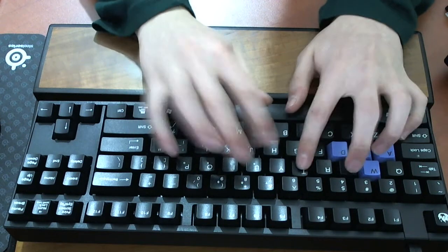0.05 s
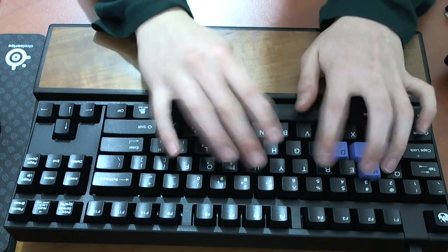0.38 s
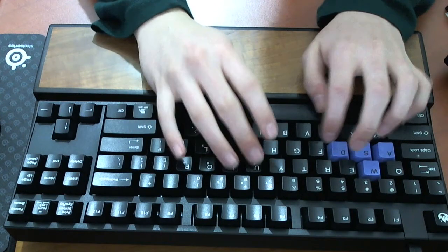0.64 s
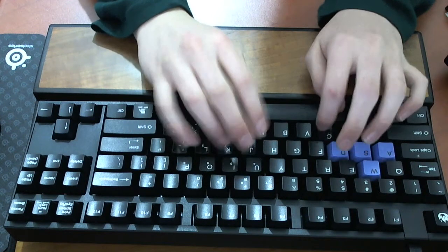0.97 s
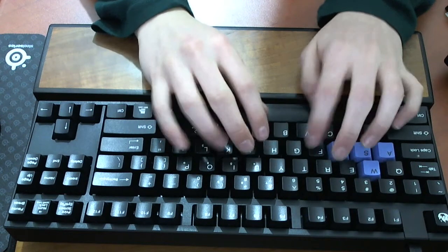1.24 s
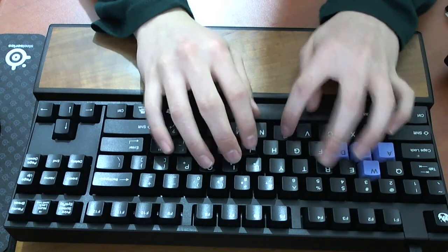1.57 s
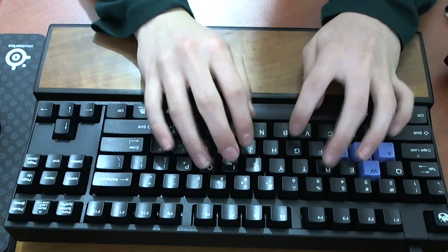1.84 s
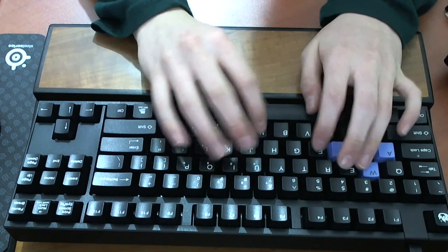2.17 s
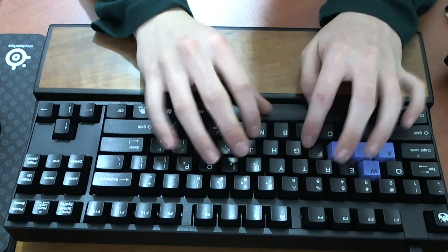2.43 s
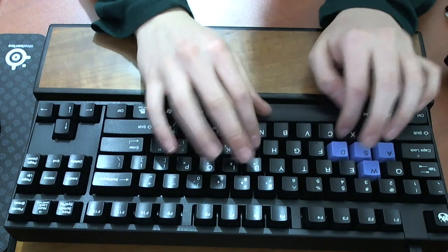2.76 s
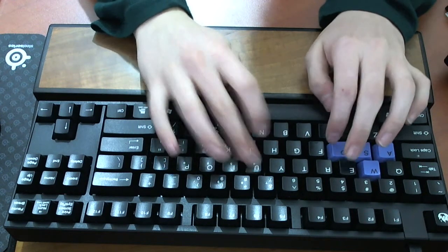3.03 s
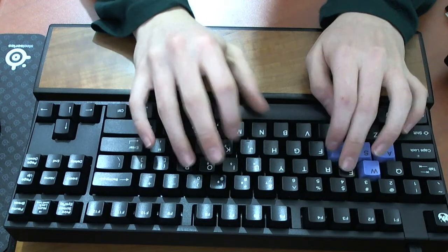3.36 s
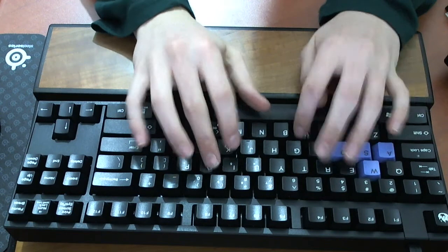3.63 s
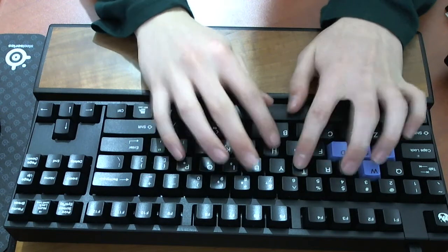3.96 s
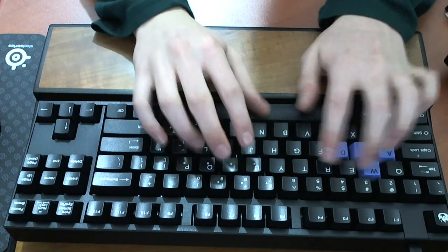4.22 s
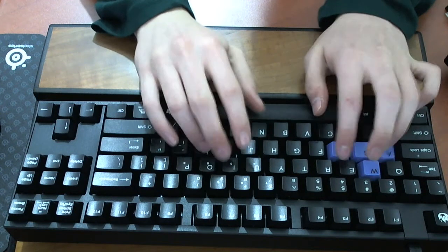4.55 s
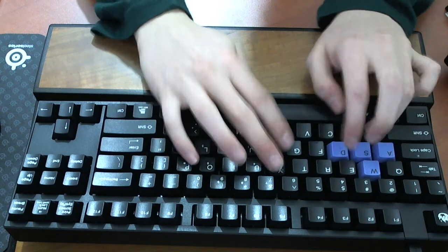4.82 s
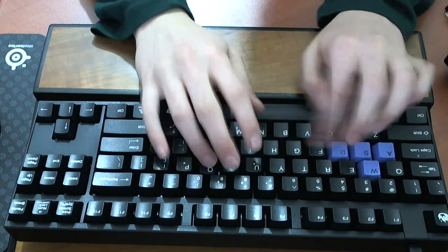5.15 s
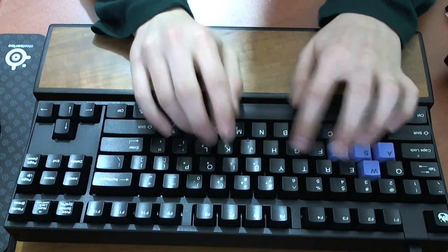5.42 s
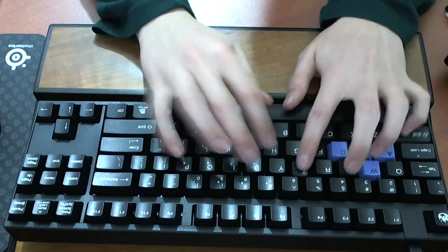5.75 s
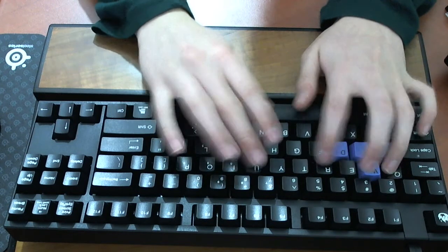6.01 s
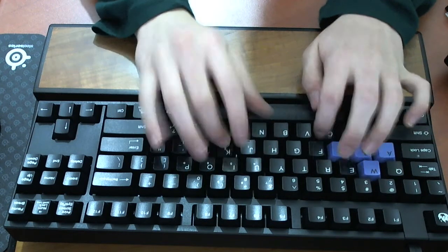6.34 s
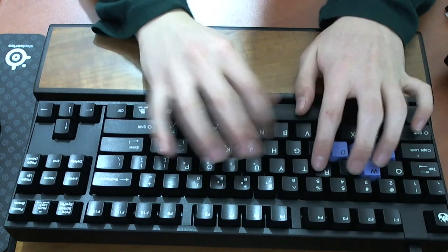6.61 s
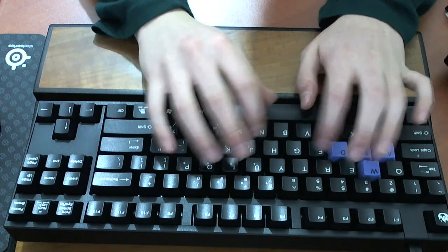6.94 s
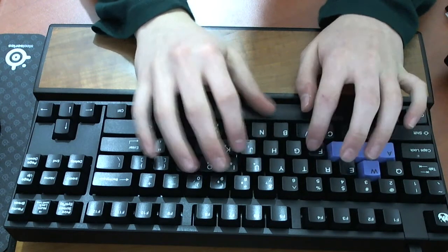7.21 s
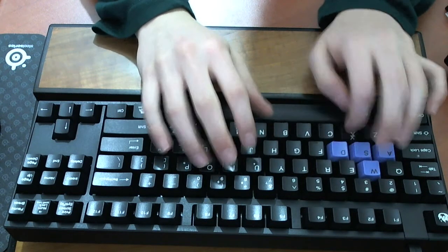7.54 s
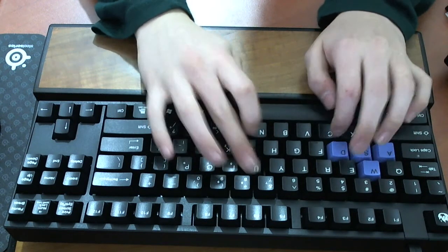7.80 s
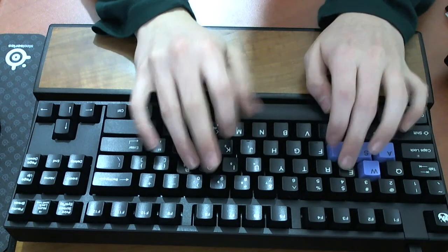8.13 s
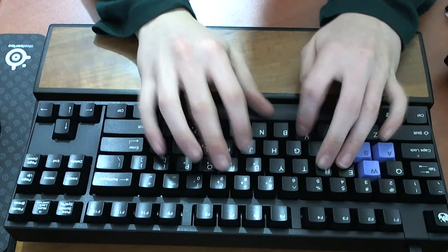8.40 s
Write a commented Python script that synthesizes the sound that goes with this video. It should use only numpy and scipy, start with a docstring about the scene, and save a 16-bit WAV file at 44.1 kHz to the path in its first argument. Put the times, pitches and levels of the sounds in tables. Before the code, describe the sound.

Fast typing on a clicky mechanical keyboard is heard close up in a small, quiet room for almost nine seconds. Each stroke is a sharp, bright click joined to a hard clack, with a brief metallic ring, light keycap rattle and faint spring shimmer. A quick run opens, with a soft hollow clunk from the case at 0.2 seconds. From about 0.7 to 2 seconds the strokes are sparser. Then the typing runs fast and uneven, with short pauses around 4.3 and 7 seconds and harder hits near 4 and 7.5 seconds. The case clunks softly again around 5.8 and 7.5 seconds. Faint, low thuds of hands on the desk come throughout, mostly on the left, and a palm slides with a faint rumble near 6.3 and 7.5 seconds. A dense flurry of keys runs from 8 seconds to the end.

```python
"""Fast typing on a clicky keyboard

Heard up close in a small room: a finger taps a key's cap, the switch snaps, and milliseconds later
the key knocks on a steel plate. Caps rattle as they spring back, and the springs shimmer.
Hands thud on the desk, the hollow case clunks, a palm slides, and something squeaks faintly once."""
import sys
import numpy as np
from scipy import signal
from scipy.fft import rfft, irfft, next_fast_len
from scipy.io import wavfile
from scipy.ndimage import map_coordinates

SR = 44100
rng = np.random.default_rng(int(sys.argv[2]) if len(sys.argv) > 2 else 0)


def wrap_up_sound(samples):
    """Save the sound to the file named by the first command line argument, as 16-bit audio."""
    columns = np.atleast_2d(samples).T
    # keep every value between -1 and 1, then stretch to whole-number steps
    tamed = np.clip(columns, -1, 1)
    steps = np.round(tamed * 32767).astype(np.int16)
    wavfile.write(sys.argv[1], SR, steps)


N = 382165
T = np.arange(SR // 5) / SR  # the time axis of one short sound, in seconds


# keys pushed all the way down: t/s at the bottom, click level/dB, knock level/dB, cap f/Hz, plate level/dB
FULL_STROKES = [(0.0767, -19.5, -9.5, 2566, -29.5), (0.1492, -17, -10, 2600, -32),
                (0.2462, -21.5, -16.5, 2700, -33), (0.4001, -18, -14, 3100, -32.5),
                (0.4713, -18, -14.5, 2410, -32.5), (0.5407, -16.5, -10, 2400, -38.5),
                (1.0055, -21, -10.5, 2625, -38), (1.0945, -15, -15.5, 2730, -43),
                (1.5992, -21.5, -15.5, 2570, -45), (1.7642, -15, -8, 2410, -27.5),
                (2.0592, -19, -15, 2700, -48.5), (2.2726, -18.5, -8, 2616, -29.5),
                (2.4477, -18, -11, 2387, -48.5), (2.5641, -14, -15, 2770, -38),
                (2.6574, -17.5, -12.5, 2950, -36.5), (2.8402, -16.5, -12, 2490, -42.5),
                (2.9838, -16.5, -11.5, 2355, -37), (3.1566, -19.5, -14, 2510, -43),
                (3.3061, -18.5, -13, 2730, -41), (3.4429, -13.5, -12, 2480, -47),
                (3.5902, -21, -15.5, 2664, -40.5), (3.6984, -20, -10, 2540, -36),
                (3.7346, -17.5, -16.5, 2850, -32.5), (3.7903, -17.5, -14, 2387, -41),
                (3.9731, -16.5, -2.5, 2710, -27), (4.0447, -14.5, -12.5, 2620, -37),
                (4.1261, -22.5, -10.5, 2850, -35), (4.5587, -20, -13, 2754, -34),
                (4.6495, -16, -17, 3130, -35), (5.0778, -17.5, -11.5, 2276, -42),
                (5.1869, -16, -18, 2780, -42.5), (5.3086, -26, -15, 2560, -44.5),
                (5.411, -18.5, -12.5, 3056, -38), (5.7413, -16.5, -12.5, 2630, -34.5),
                (5.8438, -20, -12, 2650, -37.5), (6.052, -22, -11.5, 3160, -33),
                (6.1118, -15.5, -17, 2440, -37.5), (6.1668, -18.5, -13, 2600, -35),
                (6.294, -21, -8.5, 2840, -35.5), (6.3883, -23.5, -13.5, 2640, -32),
                (6.5681, -18.5, -14, 2530, -40), (6.6485, -13.5, -8, 2430, -26),
                (6.7174, -15.5, -17, 2590, -41), (6.829, -18.5, -12.5, 2920, -32),
                (6.8484, -17, -19, 3160, -34), (7.3495, -15.5, -15.5, 2550, -36.5),
                (7.3961, -15.5, -15, 2630, -41.5), (7.416, -31, -14.5, 2260, -30.5),
                (7.5282, -17, -3.5, 3040, -28), (7.751, -14, -7.5, 2704, -28),
                (7.9012, -41, -17.5, 2290, -36), (7.9168, -24, -8, 2480, -30),
                (8.1806, -16.5, -14, 2430, -43.5), (8.307, -14, -12.5, 2624, -29),
                (8.372, -21.5, -11.5, 2500, -39.5), (8.4672, -13.5, -16.5, 2500, -33),
                (8.6298, -18.5, -5.5, 3140, -27)]
def strokes():
    """Work out when each full stroke clicks: a firmer finger gets from click to bottom sooner."""
    rows = []
    for bottom_s, click_db, knock_db, cap_hz, plate_db in FULL_STROKES:
        travel_s = .0039 * .5 ** (knock_db / 12)  # 12 dB harder takes half the time
        rows.append((bottom_s - travel_s, click_db, travel_s, knock_db, cap_hz, plate_db))
    return rows


# keys that click but barely reach the bottom: t/s, click level/dB, plate level/dB
LIGHT_PRESSES = [(0.3127, -26.5, -36.5), (1.2041, -21, -48), (2.21, -16, -70), (2.353, -21, -50.5),
                 (2.5383, -19.5, -48.5), (3.361, -16, -61.5), (4.1784, -22, -73), (4.7074, -22.5, -45.5),
                 (4.8039, -16, -36), (4.872, -20.5, -47), (5.481, -20, -35.0), (5.6034, -19.5, -57),
                 (5.6365, -18.5, -81), (5.8919, -19, -38), (6.2521, -21, -37.5), (6.4433, -18, -51),
                 (7.228, -19.5, -45.5), (7.65, -18.5, -51), (8.0455, -15, -40), (8.1137, -17, -38.5),
                 (8.2042, -21, -44), (8.4232, -17, -42), (8.4841, -19, -37.5), (8.6642, -16.5, -55)]
LIGHT_TRAVEL_S, AVERAGE_CAP_HZ = .0092, 2566
def presses():
    """List all presses, full and light. A light one knocks 15 dB above its plate level."""
    light = [(s, click_db, LIGHT_TRAVEL_S, plate_db + 15, AVERAGE_CAP_HZ, plate_db)
             for s, click_db, plate_db in LIGHT_PRESSES]
    return strokes() + light


# the tone of a struck cap: f/Hz, level/dB
CAP_TONE = [(200, -46.5), (700, -21), (1100, -11.5), (1600, -4.5), (2100, 8.5), (2750, 3.5), (3350, 4.5),
            (4200, -6), (5500, -11), (7500, -16), (10000, -22), (15000, -64.5)]
def knocks():
    """The key hits bottom: one hard, dry push into the cap, which chatters and rings briefly."""
    out = np.zeros(N)
    push = 1. * (T == 0)
    for s, _, travel_s, db, cap_hz, _ in presses():
        tone = key_tone(CAP_TONE, spread=.01, ripple_db=4)
        stretch = cap_hz / AVERAGE_CAP_HZ
        blow = at_level(coloured(push, tone, stretch), db - .3, .00077)
        chatter = at_level(coloured(noise() * fade(.033), tone, stretch), db - 10, .0029)
        add(out, s + travel_s, blow + chatter + amp(db - 25) * cap_ring())
    return out


# the notes a cap rings at: f/Hz, level/dB, time to die away t/s
CAP_NOTES = [(2063, 0.5, 0.11), (2430, -16, .03), (2850, -24, 0.023), (3310, 1, 0.082)]
def cap_ring():
    """A cap rings with a few dying notes, their strength and pitch a little different each time."""
    chance = rng.standard_normal((len(CAP_NOTES), 2))
    return sum(amp(db + 4 * louder) * fade(t60) * np.sin(2 * np.pi * hz * (1 + .012 * higher) * T)
               for (hz, db, t60), (louder, higher) in zip(CAP_NOTES, chance))


# the tone of a switch's click: f/Hz, level/dB
SWITCH_TONE = [(800, -36), (3200, -3.5), (6800, -9.5), (7800, -6.5), (8800, 8), (10900, -8), (12000, -10),
               (15500, -34)]
def clicks(snap_s=.002):
    """A small sleeve in the switch snaps down, buzzes against its stop and jingles briefly."""
    out = np.zeros(N)
    burst = np.sqrt(np.abs(np.sin(np.pi * np.minimum(T / snap_s, 1))))
    for s, db, *_ in presses():
        tone = key_tone(SWITCH_TONE, spread=.04, ripple_db=2)
        snap = np.sign(noise()) * burst  # quick pushes and pulls
        crack = at_level(coloured(snap, tone), db, snap_s)
        jingle = at_level(coloured(noise() * fade(.066), tone), db - 16.5, .021)
        add(out, s, crack + jingle)
    return out


def plate():
    """Each press bends the steel plate under the keys as the key nears the bottom."""
    out = np.zeros(N)
    for s, _, travel_s, _, _, db in strokes():
        add(out, s + .85 * travel_s, clack(db - .7))
    for s, _, db in LIGHT_PRESSES:
        add(out, s + .5 * LIGHT_TRAVEL_S, clack(db))
    return out


# the tone of the steel plate: f/Hz, level/dB
PLATE_TONE = [(450, -46.5), (720, -5.5), (900, -2.5), (1050, 11.5), (1130, 5), (1222, 10.5), (1330, -3),
              (1431, 7), (1560, -12), (3000, -37)]
def clack(db):
    """The plate swells and rings at three pitches, mixed differently under each key."""
    force = noise() * fade(.045) * (1 - fade(.02)) ** 2
    return at_level(coloured(force, key_tone(PLATE_TONE, spread=.02, ripple_db=3.5)), db, .016)


# caps springing back or brushed between strokes: t/s, cap level/dB, switch level/dB
LOOSE_TAPS = [(0.187, -25, -33.5), (0.283, -27, -59.5), (0.321, -36, -45.5), (0.494, -31.5, -32.5),
              (0.657, -35.5, -28.5), (0.674, -30.5, -32.5), (1.134, -29.5, -48), (1.306, -34, -37),
              (1.321, -31, -51), (1.451, -45, -37.5), (1.561, -36.5, -51.5), (1.741, -38.5, -40),
              (1.808, -31, -32.5), (1.852, -27.5, -35.5), (2.025, -39.5, -35.5), (2.145, -32.5, -34),
              (2.181, -45.5, -30), (2.24, -44, -33), (2.286, -24, -26), (2.47, -26, -40),
              (2.524, -34.5, -39), (2.626, -46, -33), (2.643, -34, -24.5), (2.701, -31.5, -41.5),
              (2.725, -34.5, -26), (2.797, -33.5, -42.5), (2.817, -38, -36.5), (2.957, -36, -32.5),
              (3.083, -29.5, -31.5), (3.138, -29, -29), (3.25, -31, -34.5), (3.373, -33.5, -33.5),
              (3.469, -36, -25), (3.505, -36, -34.5), (3.529, -31, -39), (3.568, -32, -31.5),
              (3.813, -29, -26), (3.892, -26.5, -29.5), (4.107, -30.5, -29.5), (4.26, -28.5, -44.5),
              (4.608, -38.5, -29.5), (4.796, -28, -24), (4.863, -32.5, -29), (4.925, -31.5, -36.5),
              (4.965, -34.5, -37), (4.979, -28, -31), (5.006, -32.5, -32.5), (5.104, -25.5, -34.5),
              (5.17, -27.5, -28), (5.192, -24, -29.5), (5.259, -36, -27), (5.389, -38, -35.5),
              (5.573, -38, -44.5), (5.687, -29, -42), (5.822, -24.5, -26.5), (5.924, -27, -37.5),
              (5.951, -26, -62), (5.983, -25, -28), (6.364, -34.5, -36), (6.472, -28, -31),
              (6.739, -32, -30.5), (6.91, -39, -24.5), (6.937, -29, -36), (7.201, -26, -38.5),
              (7.315, -28.5, -32), (7.484, -43, -37), (7.542, -37.5, -28), (7.598, -30.5, -37),
              (7.619, -23.5, -31.5), (7.669, -39, -52.5), (7.875, -56.5, -34.5), (8.033, -23.5, -42.5),
              (8.103, -40, -41.5), (8.258, -39, -30), (8.276, -22.5, -29.5), (8.359, -27.5, -24.5),
              (8.403, -38, -25.5), (8.442, -29, -31), (8.495, -26.5, -32), (8.549, -26, -26.5),
              (8.571, -23.5, -40.5)]
# the tones of a wobbling cap and of the stem it sits on: f/Hz, level/dB
LOOSE_CAP_TONE = [(500, -30), (1650, -8.5), (2100, 3.5), (3300, -1.5), (5400, -7.5), (15000, -40)]
STEM_TONE = [(2500, -30), (7000, -6.5), (8400, 2.5), (9500, 2), (11000, -10.5), (15500, -29.5)]
BRUSH_S = .013  # how long a graze takes to swell
def taps():
    """A finger slides on a loose cap, which chatters, shaking the switch and, weakly, the plate."""
    out = np.zeros(N)
    for s, cap_db, switch_db in LOOSE_TAPS:
        add(out, s - BRUSH_S, brush(cap_db - 11.5))
        add(out, s, tick(LOOSE_CAP_TONE, cap_db) + tick(STEM_TONE, switch_db) + clack(cap_db - 11))
    return out


def touches():
    """On a full stroke the fingertip lands just before the click and scrapes the cap going down."""
    out = np.zeros(N)
    for s, _, travel_s, knock_db, *_ in strokes():
        force_db, lead = rng.normal([0, 1], [2.5, .15])
        landing = tick(LOOSE_CAP_TONE, db=-34) + tick(STEM_TONE, db=-32.5)
        add(out, s - lead * .0075, amp(force_db) * landing)
        add(out, s + travel_s - 1.5 * BRUSH_S, brush(knock_db - 24))
    return out


def rattles(ticks):
    """After each press the cap rocks on its stem: a fine rustle, and a few ticks as it bounces back."""
    out = np.zeros(N)
    contact = np.sin(np.pi * np.minimum(T / .1, 1))
    for s, _, travel_s, *_ in presses():
        tone = key_tone(LOOSE_CAP_TONE, spread=.15, ripple_db=4)
        rustle = coloured(grit(share=.018) * contact, tone, stretch=1.3)
        add(out, s, at_level(rustle, -55, T[-1] / 2))
        for delay_s, shake_db in zip(rng.normal(.032, .007, ticks), rng.normal(0, 2.5, ticks)):
            bounce = tick(LOOSE_CAP_TONE, shake_db - 44) + tick(SWITCH_TONE, shake_db - 50.5)
            add(out, s + travel_s + delay_s, bounce)
    return out


def tick(tone, db):
    """A loose part starts to chatter and settles within a few milliseconds."""
    settle = fade(.02) + amp(-22) * fade(.07)
    force = grit(share=.06) * settle * (1 - fade(.0026)) ** 2
    return at_level(coloured(force, key_tone(tone, spread=.044, ripple_db=5.5)), db, .0035)


def brush(db):
    """A fingertip grazes a cap: fine grit that swells and fades."""
    swell = np.interp(T, [0, BRUSH_S, 3 * BRUSH_S], [0, 1, 0])
    tone = key_tone(LOOSE_CAP_TONE, spread=.1, ripple_db=3)
    return at_level(coloured(grit(share=.11) * swell, tone, stretch=1.332), db, 2 * BRUSH_S)


# blows to the keyboard's case: t/s, level/dB
CASE_BLOWS = [(.188, -36.5), (3.97, -53.5), (5.484, -51.5), (5.822, -38.5), (6.645, -49), (7.527, -39.5)]
# the tone of the case: f/Hz, level/dB
CASE_TONE = [(100, -5), (270, 0.5), (420, 4), (600, 17), (1400, 9.5), (3000, -28)]
def case_clunks():
    """Now and then a blow makes the hollow case clunk."""
    return bumps(CASE_BLOWS, CASE_TONE, t60=.17)


# the heel of a hand jolting the desk: t/s, level/dB
HAND_THUDS = [(.303, -50.5), (1.01, -51.5), (2.488, -52.5), (3.985, -50.5), (4.259, -52), (4.575, -52.5),
              (5.418, -48), (5.935, -52.5), (6.32, -49), (6.398, -44), (6.731, -53.5), (7.41, -52),
              (7.53, -49.5), (8.468, -46.5), (8.535, -50)]
# the tone of the desk: f/Hz, level/dB
DESK_TONE = [(20, -52.5), (45, -23), (100, 14), (165, 0), (290, -11.5), (600, -33)]
def desk_thuds():
    """The desk takes the weight of the hands and a little of every full stroke."""
    landings = [(s + travel_s, knock_db - 47.5) for s, _, travel_s, knock_db, *_ in strokes()]
    return bumps([*HAND_THUDS, *landings], DESK_TONE, t60=.12)


# a palm shifting: start t/s, length t/s, level/dB
PALM_MOVES = [(6.276, 0.24, -55), (7.527, 0.064, -41), (8.39, .22, -63.5)]
# the tone of its rubbing: f/Hz, level/dB
PALM_TONE = [(60, -34.5), (130, 3), (290, -8.5), (600, -22)]
def palm_slides():
    """A palm drags on the wrist rest with a low rumble that swells and fades."""
    out = np.zeros(N)
    for s, length_s, db in PALM_MOVES:
        swell = np.sqrt(np.hanning(round(length_s * SR)))
        rumble = coloured(rng.standard_normal(SR), PALM_TONE)[:len(swell)]
        add(out, s, at_level(rumble * swell, db, length_s))
    return out


def squeak(start_s, hz, db):
    """A faint squeak that sags a little in pitch as it swells."""
    out = np.zeros(N)
    swell = np.sin(np.pi * T / T[-1])
    pitch_hz = hz * (1 - .031 * swell)
    add(out, start_s, amp(db) * swell * np.sin(2 * np.pi * np.cumsum(pitch_hz) / SR))
    return out


# the tone of the springs under the keys: f/Hz, level/dB
SPRING_TONE = [(3800, -27.5), (5000, -5.5), (6200, -24)]
def springs(keys):
    """The many coil springs, all shaken by the typing, leave a faint shimmer."""
    shimmer = coloured(rng.standard_normal(SR) * fade(.4, np.arange(SR) / SR), SPRING_TONE)
    return amp(-31) * signal.fftconvolve(keys, shimmer / np.linalg.norm(shimmer))[:N]


def room(keys, parts=60):
    """The walls give each part of the typing its own short echo, as the keys lie in different places."""
    out = np.zeros(N)
    build_up = 1 - fade(.02)
    for part in np.array_split(np.arange(N), parts):
        echo = noise() * fade(.145) * build_up
        add(out, part[0] / SR, signal.fftconvolve(keys[part], echo / np.linalg.norm(echo)))
    return out


# the tone of the quiet room: f/Hz, level/dB
HUSH_TONE = [(30, -38), (105, 7), (230, -12.5), (520, -3.5), (1800, -13.5), (15000, -45)]
def hush(db):
    """The steady hush of the room."""
    return at_level(coloured(rng.standard_normal(next_fast_len(N)), HUSH_TONE)[:N], db, N / SR)


def bumps(blows, tone, t60):
    """Soft blows swell and quickly die in a large body."""
    out = np.zeros(N)
    for s, db in blows:
        force = noise() * fade(t60) * (1 - fade(t60 / 2))
        add(out, s, at_level(coloured(force, tone), db, .048))
    return out


def key_tone(tone, spread, ripple_db):
    """No two keys sound alike: shift a tone a little and give it random peaks and dips."""
    hz = np.geomspace(100, SR / 2, num=480)
    ripple = signal.resample(rng.standard_normal(48), len(hz))
    shifted_db = level_at(tone, hz * np.exp(spread * rng.normal()))
    return np.column_stack([hz, shifted_db + ripple_db * ripple])


def coloured(x, tone, stretch=1):
    """Give x the tone of an object; a stretch above 1 raises its pitch."""
    gain_db = level_at(tone, np.fft.rfftfreq(len(x), 1 / SR) / stretch)
    cepstrum = irfft(np.log(amp(gain_db)), len(x))
    # fold the second half onto the first, so the object rings only after it is hit
    cepstrum[1:len(x) // 2] *= 2
    cepstrum[len(x) // 2:] = 0
    return irfft(rfft(x) * np.exp(rfft(cepstrum)), len(x))


def level_at(tone, hz):
    """Read a tone's level between its listed frequencies."""
    listed_hz, db = np.transpose(tone)
    return np.interp(np.log(hz + 1), np.log(listed_hz), db)


def grit(share):
    """A run of tiny contacts; share is the chance of one in each sample."""
    return noise() * ((rng.random(len(T)) < share) + .046)


def noise():
    """Fresh hiss for one contact."""
    return rng.standard_normal(len(T))


def fade(t60, t=T):
    """Die away by 60 dB in t60 seconds."""
    return 1000. ** (-t / t60)


def amp(db):
    """Turn decibels into a multiplier."""
    return 10 ** (np.asarray(db) / 20)


def at_level(x, db, span_s):
    """Scale x so that its first span_s seconds have this average (rms) level."""
    return x * amp(db) / np.sqrt(np.mean(x[:int(span_s * SR) + 1] ** 2))


def add(track, s, x):
    """Mix x into the track, starting at s seconds."""
    part = track[max(round(s * SR), 0):][:len(x)]
    part += x[:len(part)]


def treble_sway(keys, db, rate_hz):
    """The high part of the sound leans a little left or right, at random."""
    treble = signal.sosfilt(signal.butter(1, 3000, "high", fs=SR, output="sos"), keys)
    places = rng.standard_normal(int(N * rate_hz / SR) + 4)
    return amp(db) * map_coordinates(places, [np.arange(N) * rate_hz / SR]) * treble


def scene():
    """Keys in the middle, case and palm a little to the left, desk mostly on the left."""
    keys = touches() + clicks() + knocks() + taps() + rattles(ticks=3) + plate()
    keys += squeak(start_s=.076, hz=531, db=-46)
    middle = keys + springs(keys) + amp(-16.5) * room(keys)
    side = treble_sway(keys, db=-17, rate_hz=38) + amp(-43) * room(keys)
    typing = np.array([middle + side, middle - side])  # left, right
    case_and_palm = (case_clunks() + palm_slides()) * amp([[1.5], [-1.5]])
    desk = desk_thuds() * amp([[4.2], [-10]])
    return typing + case_and_palm + desk + hush(db=-62.5) * amp([[.7], [-.7]])


def record(dry):
    """Round off the hardest peaks, thin the deep bass and cut the very highest treble."""
    rounded = dry / (1 + dry ** 4) ** (1 / 4)
    thinned = signal.sosfilt(signal.butter(2, 45, "high", fs=SR, output="sos"), rounded)
    size = next_fast_len(N + SR)
    kept_band = np.fft.rfftfreq(size, 1 / SR) < 15700
    return irfft(rfft(thinned, size) * kept_band, size)[:, :N]


dry = scene()
out = record(dry)
wrap_up_sound(out)
```